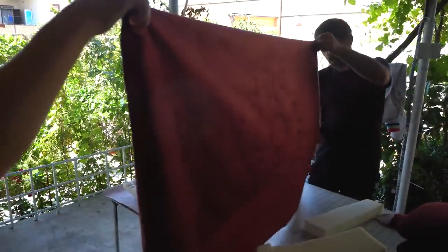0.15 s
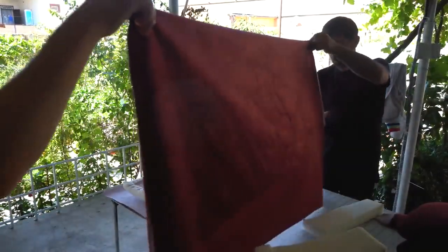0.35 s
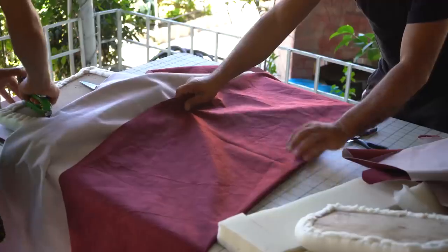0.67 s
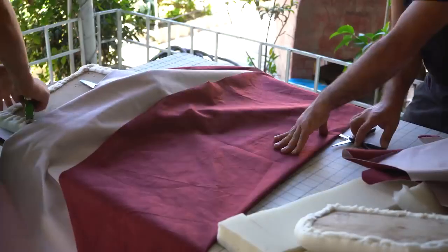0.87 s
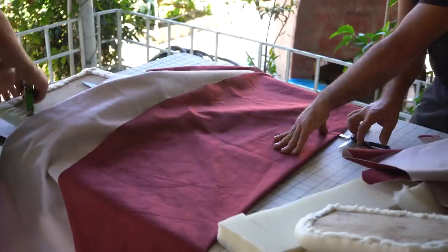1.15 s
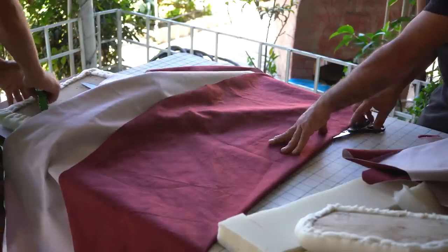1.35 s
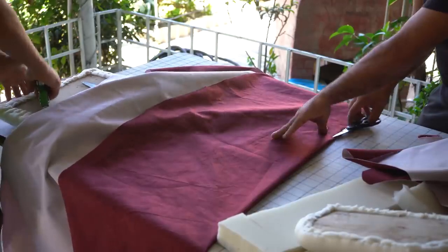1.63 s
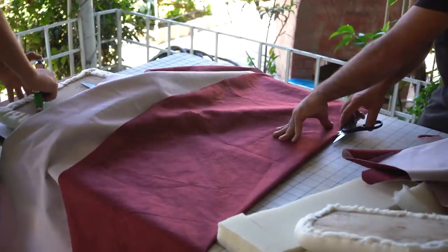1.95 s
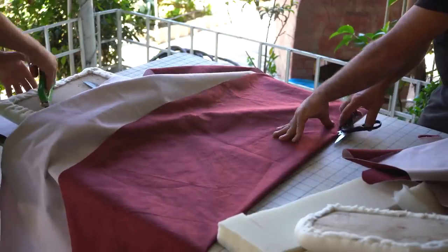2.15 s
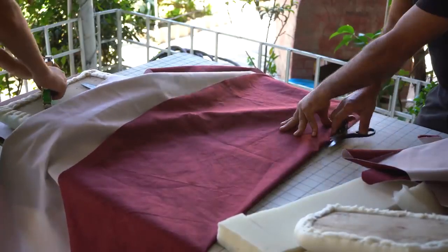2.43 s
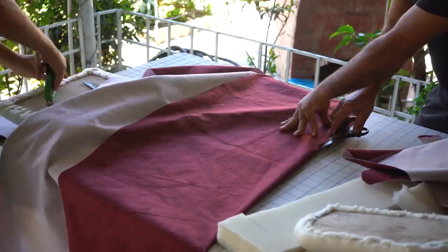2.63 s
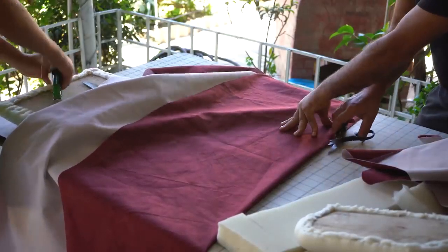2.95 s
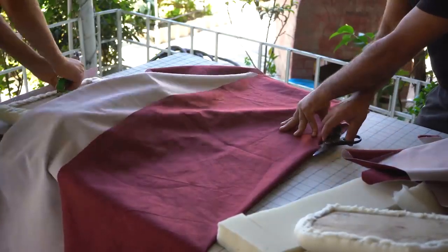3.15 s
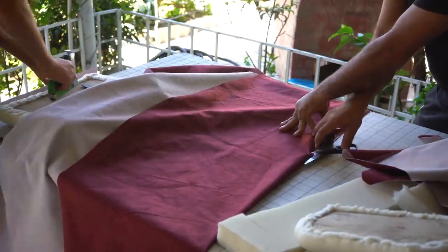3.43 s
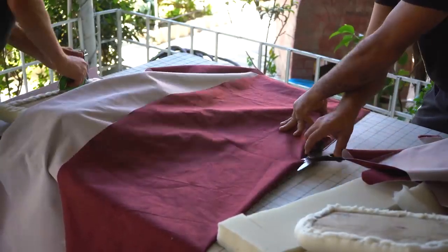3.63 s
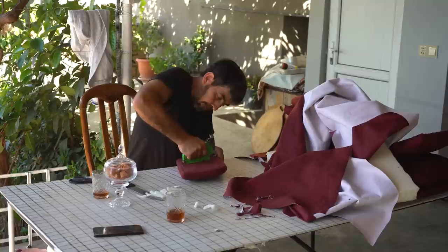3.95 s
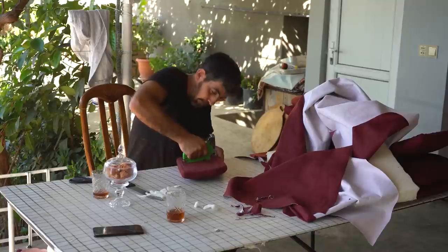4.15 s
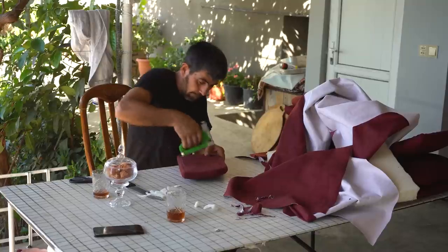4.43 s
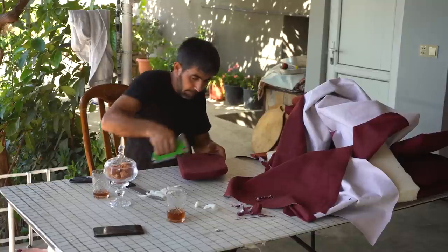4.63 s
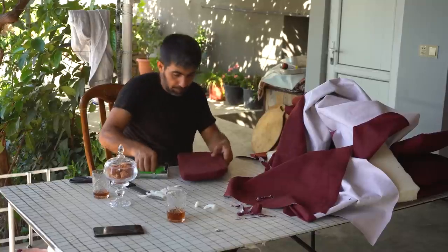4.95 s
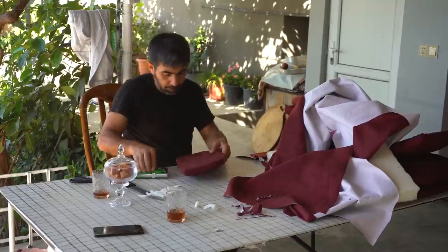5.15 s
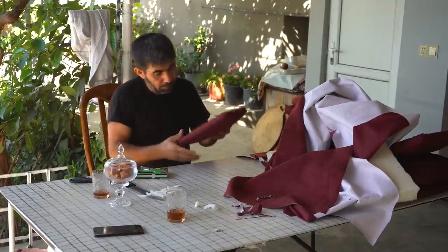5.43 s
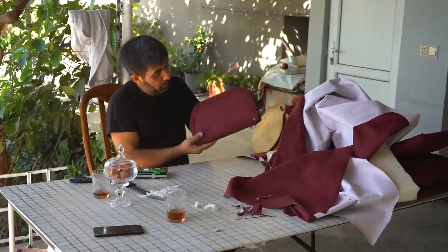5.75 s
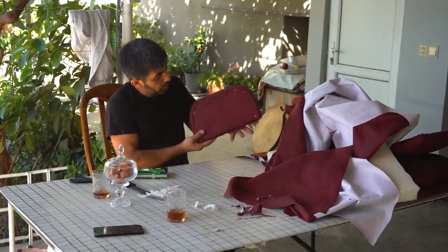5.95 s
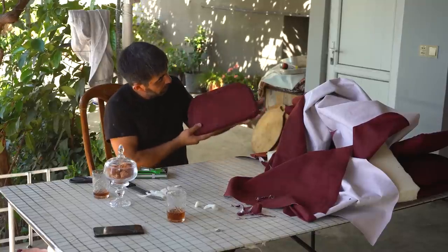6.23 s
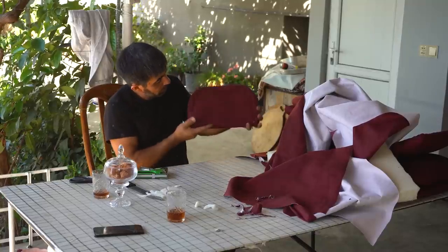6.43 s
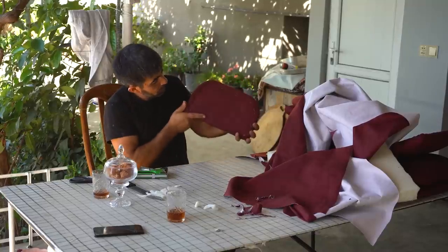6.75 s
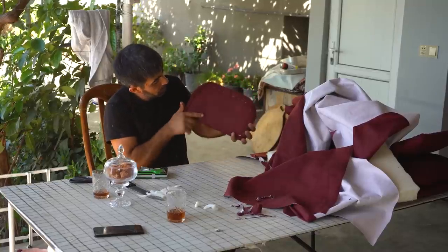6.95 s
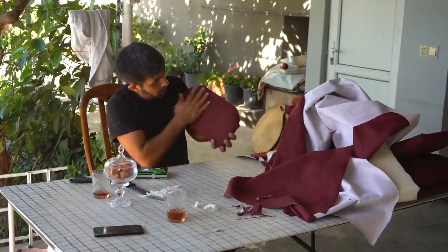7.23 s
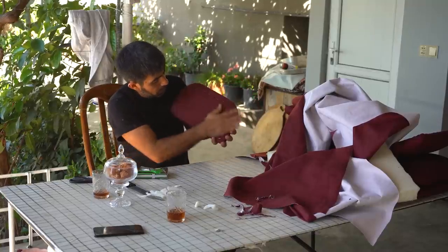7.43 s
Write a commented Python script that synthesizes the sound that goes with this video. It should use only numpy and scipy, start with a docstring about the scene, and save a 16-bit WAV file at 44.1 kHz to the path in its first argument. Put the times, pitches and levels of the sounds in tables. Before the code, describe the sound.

A quiet, distant town hum runs throughout on a roofed patio. Cloth rustles softly at the start. From about 0.65 to 4 seconds a hand staple gun fires about a dozen sharp, loud shots through fabric into a wooden seat board, roughly every half second at first, then closer together with quick doubles around 3 seconds. Each shot is a steel crack with a short woody ring and a brief echo. Between shots the lever clicks back, with faint spring squeaks near 1.2, 2.2 and 4.3 seconds, soft rustles, tiny ticks and light table knocks. At 4 seconds the hum drops and the hits sound slightly farther off. A last lever click comes at 4.5 seconds. From 5.1 to 5.4 seconds the gun is laid on the table with a few thuds. Two very faint cloth rustles follow near 6.7 and 7.4 seconds.

```python
"""On a roofed patio, distant town noise hums throughout and cloth rustles first.
From 0.65 s to about 4 s a hand staple gun drives staples through the cloth into a wooden seat board.
In each shot the steel striker cracks loose, hits the staple home and the board rings. Between shots
the lever snaps back or its spring squeaks. Just after 5 s the gun is laid on the table with a few
thuds. Last come two faint rustles of cloth over the town."""
import sys
import numpy as np
from scipy import signal
from scipy.fft import rfft, irfft, next_fast_len
from scipy.io import wavfile
from scipy.ndimage import uniform_filter1d

SR = 44100
rng = np.random.default_rng(int(sys.argv[2]) if len(sys.argv) > 2 else 0)


def persist_wave(psi):
    """Save psi, clipped to +-1, as 16-bit WAV."""
    counts = np.round(np.clip(psi, -1, 1) * 32767).astype(np.int16)
    wavfile.write(sys.argv[1], SR, np.atleast_2d(counts).T)


N = 334630
RING = int(.7 * SR)  # samples set aside for one hit to die away


def undb(db):
    """Turn decibels into a plain gain."""
    return 10 ** (np.asarray(db) / 20)


def unit(x):
    """Scale a signal to an average power of 1."""
    return x / np.sqrt(np.mean(x ** 2))


def along(table, hz):
    """Read between the rows of a (frequency, value) table, with octaves evenly spaced."""
    f, values = np.transpose(table)
    return np.interp(np.log(np.maximum(hz, 1)), np.log(f), values)


def bands(count, per_octave):
    """Overlapping bands of noise from low to high, each with its centre frequency."""
    size = next_fast_len(count)
    f = np.maximum(np.fft.rfftfreq(size, 1 / SR), 1)
    for hz in 22 * 2 ** np.arange(0, 9.7, 1 / per_octave):
        shape = np.cos(np.pi / 2 * np.clip(per_octave * np.log2(f / hz), -1, 1))
        yield hz, irfft(rfft(rng.standard_normal(size)) * shape, size)[:count]


def wobble(rate_hz):
    """A smooth random wander, about 1 in size."""
    hold = int(SR / rate_hz)
    steps = np.repeat(rng.standard_normal(N // hold + 1), hold)
    return unit(uniform_filter1d(uniform_filter1d(steps, hold), hold)[:N])


def swell(start_s, hold_s, rise_db_s, fall_db_s):
    """A gain that reaches 1 at the start time, holds, then falls."""
    t = np.arange(N) / SR - start_s
    return undb(rise_db_s * np.minimum(t, 0) - fall_db_s * np.maximum(t - hold_s, 0))


def fade(decay_s):
    """A gain that dies away: a decay time is the time it takes to drop 60 dB."""
    return np.exp(-np.log(1000) * np.arange(RING) / SR / decay_s)


def cut_bass(x, hz, order):
    """Weaken everything below hz."""
    return signal.sosfilt(signal.butter(order, hz, "high", fs=SR, output="sos"), x)


def ring(tones, scatter_db, decay_scale=1):
    """A struck object rings with its own tones, a little differently each time; the peak is 1."""
    t = np.arange(RING) / SR
    out = 0
    for hz, db, decay_s in tones:
        strength, side, detune = rng.standard_normal(3)
        tone = np.sign(side) * np.sin(2 * np.pi * hz * (1 + 0.01012 * detune) * t)
        out = out + undb(db + scatter_db * strength) * tone * fade(decay_s * decay_scale)
    return out / np.abs(out).max()


def near(tones, centre_hz, db_per_octave):
    """Where an object is struck decides which tones ring most: those near the centre frequency."""
    return [(hz, db - db_per_octave * abs(np.log2(hz / centre_hz)), decay_s) for hz, db, decay_s in tones]


def crack(low_hz, high_hz, decay_s):
    """A short burst of noise with a peak near 1."""
    band = signal.butter(2, [low_hz, min(high_hz, .45 * SR)], "band", fs=SR, output="sos")
    burst = signal.sosfilt(band, rng.standard_normal(RING) * fade(decay_s))
    return burst / (2 * np.sqrt(np.sum(burst ** 2) * 2 * np.log(1000) / (decay_s * SR)))


# The town's balance of bass and treble: f/Hz, level/dB
TOWN_COLOUR = [(20, -10.5), (60, -3.5), (99, -7.5), (139, -1.5), (342, -3), (566, -0.5), (1050, -11),
               (1390, -19.5), (2200, -18.5), (3200, -33), (4500, -40.5), (8000, -49), (13000, -53),
               (16500, -76.5)]
# How loud the town is over time: t/s, level/dB
TOWN_LOUDNESS = [(0, -49.5), (.45, -49.5), (2.0, -48), (3.95, -46.5), (4.0, -54), (5.8, -52), (7.59, -53)]


def town():
    """Far traffic and leaves: bands of noise that drift together and flicker alone."""
    drift_db = .5 * wobble(1)
    hum = sum(undb(along(TOWN_COLOUR, hz) + drift_db + wobble(15)) * noise for hz, noise in bands(N, 3))
    s, db = np.transpose(TOWN_LOUDNESS)
    return unit(hum) * undb(np.interp(np.arange(N) / SR, s, db))


# How long the patio echoes at each pitch: f/Hz, decay/s
PATIO_DECAY = [(100, 0.41), (260, 0.57), (700, 0.35), (1840, 0.33), (4850, 0.37), (12800, 0.22)]


def patio():
    """Echoes under the roof: bands of noise and their fades, arriving after 5 ms."""
    centres, noises = zip(*bands(RING, 0.98))
    arrival = np.clip((np.arange(RING) / SR - .005) / 0.00054, 0, 1)
    return np.array(noises), np.array([fade(along(PATIO_DECAY, hz)) for hz in centres]) * arrival


# Moments when the ringing and echo of earlier hits stop short: t/s
RING_STOPS = [1.444, 1.883, 2.804, 3.96]


def place(out, s, sound, echoes, echo_db):
    """Add a hit at time s with the patio's echo, which differs for every spot."""
    noises, fades = echoes
    if s > RING_STOPS[-1]:
        echo_db += 3.5  # the late hits sound farther off
    answer = (np.roll(noises, rng.integers(RING), axis=1) * fades).sum(axis=0)
    # walls and roof hear the source from all sides, so only its broad colour returns
    energy = np.cumsum(np.abs(rfft(sound)) ** 2)
    bins = np.arange(len(energy))
    blur = 35 * RING / SR + 0.079 * bins  # 35 Hz plus 7.9 % to either side
    nearby = np.interp(bins + blur, bins, energy) - np.interp(bins - blur, bins, energy)
    colour = np.sqrt(np.abs(nearby) / (2 * blur))
    echo = irfft(rfft(answer) * colour, RING) / np.sqrt(np.sum(answer ** 2))
    stop_s = min([stop for stop in RING_STOPS if stop > s] + [s + .69])
    gate = np.clip((stop_s - s - np.arange(RING) / SR) / 0.0052, 0, 1)
    at = int(s * SR)
    out[at:at + RING] += ((sound + undb(echo_db) * echo) * gate)[:N - at]


# The cloth's balance of bass and treble: f/Hz, level/dB
CLOTH_COLOUR = [(500, -22.5), (1200, 16.5), (2200, 3.5), (4000, -14.5), (8000, -38), (16000, -16)]
# Cloth being handled and cut: t/s, hold/s, level/dB, tilt/dB (treble gain per two octaves from 2 kHz)
RUSTLES = [(0.108, 0.12, -49, 4), (.49, 0.024, -65, 10.5), (.8, 0.088, -57.5, 12), (1.192, 0.1, -53.5, 6.5),
           (1.734, 0.077, -59.5, 13.5), (2.064, 0.22, -46, 8.5), (2.563, 0.14, -55, 8),
           (2.834, .03, -44.5, -1), (3.047, 0.13, -52, -9), (3.58, 0.35, -67, 11.5), (4.267, 0.17, -61, 9),
           (6.723, 0.39, -71.5, -2.5), (7.351, 0.19, -71.5, 14.5)]


def cloth():
    """Fibres slip past each other in a dense patter of uneven grains."""
    gains = [undb(db) * swell(s, hold_s, rise_db_s=702, fall_db_s=257.5) for s, hold_s, db, _ in RUSTLES]
    power = np.array(gains) ** 2 + 1e-18
    tilt_db = np.array(RUSTLES)[:, 3] @ power / power.sum(axis=0)
    snags_db = 5 * wobble(90)  # the treble comes in separate small snags
    hiss = [(hz, undb(along(CLOTH_COLOUR, hz) + 2 * wobble(20) + snags_db * (hz > 5000)) * noise)
            for hz, noise in bands(N, 0.9036) if hz > 300]
    grains = undb(1.4 * wobble(300))
    plain_level = np.sqrt(np.mean((grains * sum(noise for _, noise in hiss)) ** 2))
    tilted = sum(undb(tilt_db * np.log2(hz / 2000) / 2) * noise for hz, noise in hiss)
    return tilted * grains / plain_level * np.sqrt(power.sum(axis=0))


# Faint ticks: t/s, level/dB, centre f/Hz
THIN_TICKS = [(.8245, -51, 11100), (.856, -54, 9000), (.8944, -50.5, 4940), (1.6154, -49, 12500),
              (2.6602, -51, 8750), (2.6844, -47, 10500), (2.787, -51, 11200), (2.8377, -45, 9700),
              (3.915, -51.5, 10000), (4.307, -56, 8500), (3.645, -62, 11000), (5.265, -57, 4900)]


def thin_ticks(out, echoes):
    """Tiny bursts of high noise, an octave wide, like scissor blades meeting."""
    for s, db, hz in THIN_TICKS:
        tick = crack(hz / np.sqrt(2), hz * np.sqrt(2), 0.021)
        place(out, s, undb(db) * tick, echoes, echo_db=-12)


# The tones of the table top: f/Hz, level/dB, decay/s
TABLE_TONES = [(127.9, -1, 0.22), (178, -2.5, 0.15), (212.4, -2, 0.036), (293, -14, 0.26), (322, 4, 0.13),
               (480, -5, 0.055), (500, 3, 0.13), (563, -20, 0.064), (625, 3, 0.12), (720, -2.5, 0.079),
               (817, -9, 0.16), (1014, -3, 0.051)]
# Things set down or shifted on it: t/s, level/dB, edge level/dB (relative to the thud), centre f/Hz
TABLE_THUDS = [(2.325, -33.5, -3, 550), (2.8, -40, -20, 397), (2.824, -30, -13, 600),
               (3.682, -31, -11, 625), (3.914, -32.5, -10, 170), (4.335, -33, -11, 330),
               (4.362, -33, -28, 330), (5.098, -11, -18.5, 382), (5.147, -29, -21, 447),
               (5.185, -36, -25, 400), (5.209, -18.5, -10.5, 453), (5.287, -22, -17, 507),
               (5.315, -27, -15, 400), (5.355, -34.5, -25, 400)]


def table_thuds(out, echoes):
    """A hard edge clacks on the table and the top rings."""
    for s, db, edge_db, centre_hz in TABLE_THUDS:
        edge = crack(800, 2000, 0.071) + undb(-28) * crack(4700, 14000, 0.044)
        top = ring(near(TABLE_TONES, centre_hz, db_per_octave=3.3), scatter_db=2.16)
        place(out, s, undb(db) * (top + undb(edge_db) * edge), echoes, echo_db=-5)


# A squeak's overtones: multiple of its pitch, level/dB
SQUEAK_OVERTONES = [(2, -34.5), (3, -25.5)]
# Each slip of the spring: peak t/s, f/Hz, level/dB, extra overtone level/dB
SPRING_SLIPS = [(1.209, 3695, -50.5, 1), (1.234, 3695, -52, 15), (1.259, 3690, -43.5, -4),
                (2.08, 2720, -51.5, -10), (2.13, 2720, -56.5, -10), (2.167, 2690, -57.5, -14),
                (2.338, 2580, -48, -11), (4.31, 3760, -60, -7), (4.334, 3695, -42, -19),
                (4.375, 3695, -64, -15)]


def spring_squeaks():
    """The lever spring rubs in its guide: each slip is a fluttering tone that lingers faintly."""
    wavering_time = np.cumsum(1 + 0.0052 * wobble(200)) / SR
    out = 0
    for s, hz, db, overtones_db in SPRING_SLIPS:
        phase = 2 * np.pi * hz * wavering_time
        slip = swell(s, 0.0033, rise_db_s=899, fall_db_s=602)
        linger = undb(-21) * swell(s, 0, rise_db_s=899, fall_db_s=99)
        overtones = sum(undb(level) * np.sin(k * phase) for k, level in SQUEAK_OVERTONES)
        out = out + undb(db) * ((slip + linger) * np.sin(phase) + undb(overtones_db) * slip * overtones)
    return np.sqrt(2) * out * undb(3.3 * wobble(100))


# The tones of the lever and of its spring: f/Hz, level/dB, decay/s
LEVER_TONES = [(1750, -12.5, 0.0038), (2122, 0, 0.0019), (2917, 11, 0.0032), (3330, -2.5, 0.012),
               (3920, -3, 0.015), (4270, -9, 0.031), (6850, -26, 0.03), (11180, -21, 0.031)]
LEVER_SPRING_TONES = [(4060, -0.5, .2), (6930, -8, 0.24), (7950, -18, 0.25), (11100, -6.5, 0.22)]
# Clicks of the lever and catch: t/s, level/dB, treble level/dB (relative to the click)
LEVER_CLICKS = [(0.482, -46.5, -13.5), (0.578, -42, -22), (0.6235, -30, -3.5), (1.0087, -33, -3.5),
                (1.0352, -29, -20), (1.3556, -17.5, -9), (1.505, -32.5, -7), (1.8365, -18, -8),
                (2.2542, -18.5, -11), (2.352, -31, -9), (2.7337, -18, -10), (3.1229, -16.5, -10),
                (3.2341, -33.5, -7), (3.4824, -27, -9.5), (3.705, -39, -11), (3.7276, -29.5, -4),
                (4, -36, -6), (4.3228, -34.5, -25), (4.544, -22.5, -5)]


def lever_clicks(out, echoes):
    """The lever or catch snaps, and the spring rings on softly."""
    for s, db, treble_db in LEVER_CLICKS:
        snap = ring(LEVER_TONES, scatter_db=3) + undb(-4.5) * crack(1550, 2900, 0.022)
        treble = crack(6000, 14000, .012) + undb(-22.5) * ring(LEVER_SPRING_TONES, scatter_db=3)
        place(out, s, undb(db) * (snap + undb(treble_db) * treble), echoes, echo_db=-9.5)


# The tones of the seat board: f/Hz, level/dB, decay/s (before decay_scale shortens it)
BOARD_TONES = [(341, -14.5, 0.5), (373.7, -8, 0.35), (432, -12, 0.53), (448.5, -0.5, 0.36),
               (466, -2.5, 0.34), (498.3, -2.5, 0.13), (540.9, 0, 0.27), (595, -14.5, 0.22),
               (617.9, 0.5, 0.16), (662.6, -0.5, 0.28), (717, -11, 0.089), (745, -12, 0.53),
               (841, -4, 0.17), (948, -3, 0.24), (1070, -5, 0.22), (1220, -9, 0.12), (1274, -4, .12)]


def seat_board(centre_hz):
    """The wooden board rings, and one hard wall answers 21 ms later."""
    wood = ring(near(BOARD_TONES, centre_hz, db_per_octave=10.5), scatter_db=2.5, decay_scale=0.6)
    return wood + undb(-4) * np.roll(wood, int(.021 * SR))


# The tones of the gun's body and of its spring: f/Hz, level/dB, decay/s
GUN_TONES = [(674, -3.5, 0.028), (1153, 4, 0.009), (1565, 0.5, 0.013), (2075, 1.5, 0.009),
             (2775, -0.5, 0.009), (3452, -14, 0.015)]
GUN_SPRING_TONES = [(998, -6, 0.43), (1127, -7.5, 0.5), (1933, 2, 0.27), (2110, -3, 0.42), (2390, 0, .25),
                    (2900, -14.5, 0.16)]
# The shots: t/s of the blow, level/dB, board level/dB, board centre f/Hz, thump level/dB,
# crack level/dB, striker travel/ms, spring level/dB; levels after the first are relative to the blow
STAPLE_SHOTS = [(0.652, -1, -6, 477, -29.5, -17.5, 4.44, -16), (1.043, 0, -4.5, 470, -30, -22.5, 3.6, -18),
                (1.5308, -9, 0.5, 443, -14, -17, 6, -23), (1.9286, -2, -3, 516, -41, -20, 5.55, -25),
                (2.3684, 0.5, -6, 590, -51, -18, 4.48, -18), (2.8543, -16, -3, 660, -13, -9.5, 1.2, -25.5),
                (2.9348, -2, -2.5, 584, -43.5, -25, 2.49, -27),
                (3.244, -15.5, -0.5, 610, -8.5, -9.5, 1.65, -20),
                (3.3321, -3.5, -6, 513, -20, -30.5, 2.5, -26.5), (3.505, -4, -7, 450, -18, -21, 6, -36),
                (3.7389, -1.5, -5, 563, -24.5, -20.5, 3.97, -29),
                (4.037, -11.5, -3, 644, -18.5, -7, 3.92, -19)]


def staple_shots(out, echoes):
    """The striker rattles free, then its blow shakes staple, gun and board."""
    lead_s = .004  # a faint burst of noise comes this long before the striker's rattle
    striker_rise = np.minimum(np.arange(RING) / SR / .002, 1)
    for s, db, board_db, centre_hz, thump_db, crack_db, travel_ms, spring_db in STAPLE_SHOTS:
        faint_burst = undb(-43) * crack(600, 11000, 0.028)
        rattle = crack(6500, 12000, 0.042) + undb(6) * crack(500, 3200, 0.048)
        blow = ring(GUN_TONES, scatter_db=3.7)
        blow += undb(crack_db) * crack(8500, 19000, 0.0097)
        blow += undb(-10) * crack(550, 1900, 0.0066)
        blow += undb(spring_db) * ring(GUN_SPRING_TONES, scatter_db=3.1)
        blow += undb(board_db) * seat_board(centre_hz)
        blow = cut_bass(blow, 280, order=2)  # keep the blow thin; the thump supplies the bass
        blow += undb(thump_db) * crack(110, 380, 0.19)
        fired = undb(crack_db) * rattle * striker_rise + np.roll(blow, int(travel_ms * SR / 1000))
        shot = faint_burst + np.roll(fired, int(lead_s * SR))
        place(out, s - travel_ms / 1000 - lead_s, undb(db) * shot, echoes, echo_db=-6.5)


def scene():
    """All the hits with their echoes, plus squeaks, cloth and town, in one channel."""
    echoes = patio()
    hits = np.zeros(N)
    staple_shots(hits, echoes)
    lever_clicks(hits, echoes)
    thin_ticks(hits, echoes)
    table_thuds(hits, echoes)
    hits = cut_bass(hits, 120, order=4)  # the hits are heard with little bass below 120 Hz
    return (hits + spring_squeaks() + cloth() + town())[None]


def record(dry):
    """Round off the loudest peaks and cut the treble above 16.1 kHz."""
    rounded = np.tanh(1.215 * dry) / 0.85
    return signal.sosfilt(signal.ellip(12, .2, 95, 16100, fs=SR, output="sos"), rounded)


dry = scene()
out = record(dry)
persist_wave(out)
```